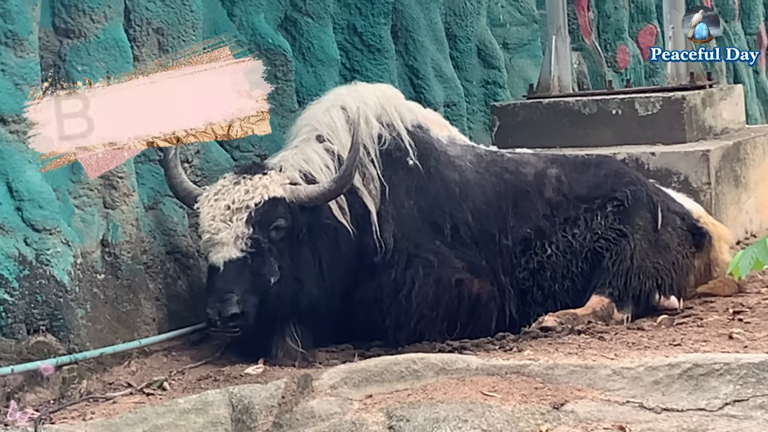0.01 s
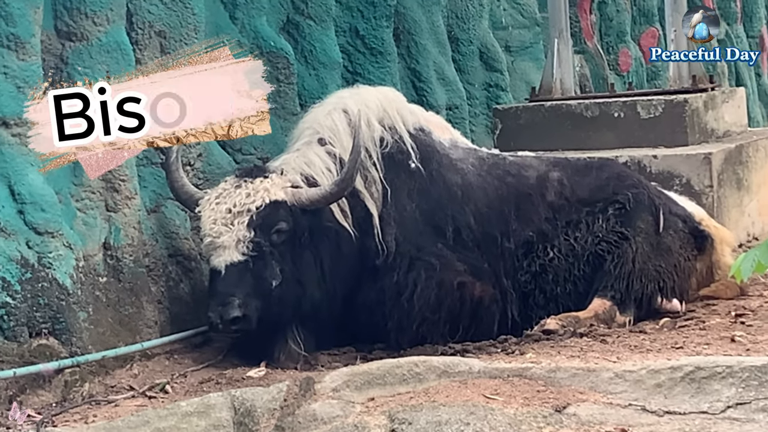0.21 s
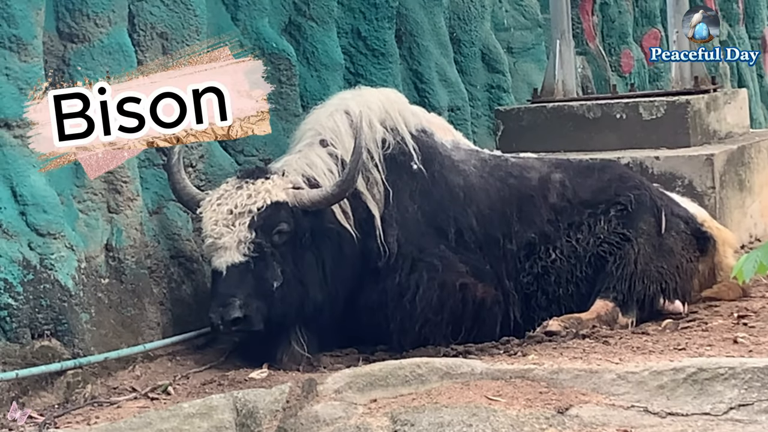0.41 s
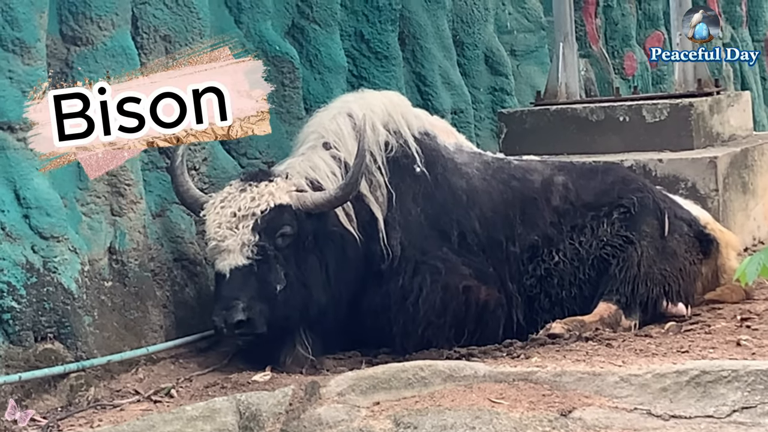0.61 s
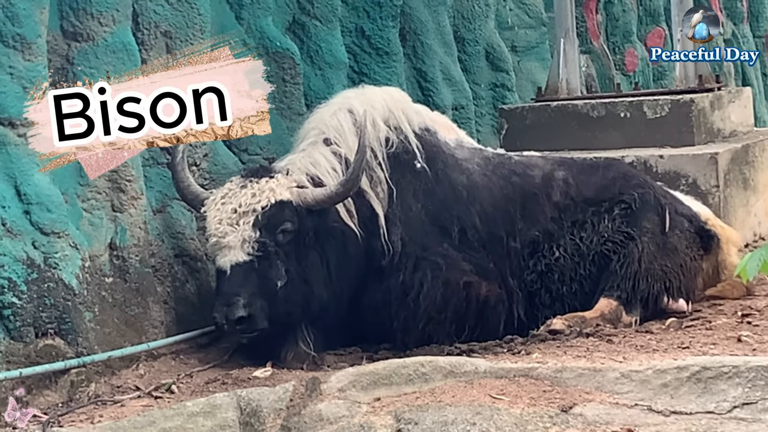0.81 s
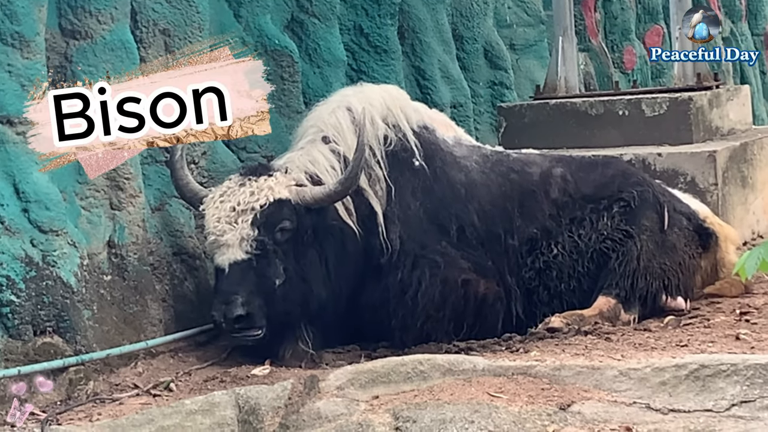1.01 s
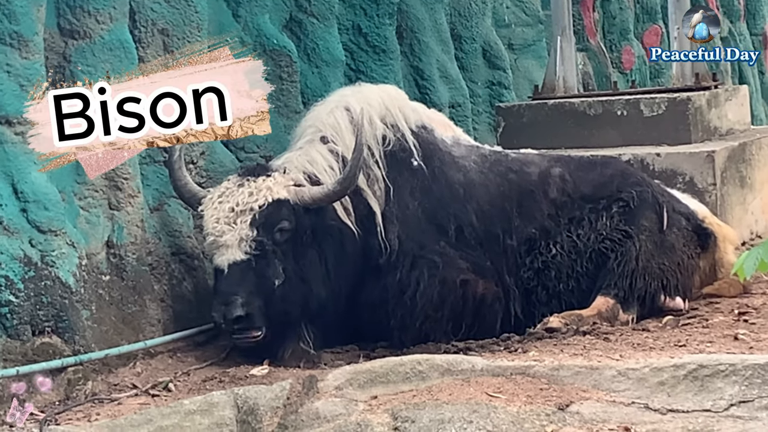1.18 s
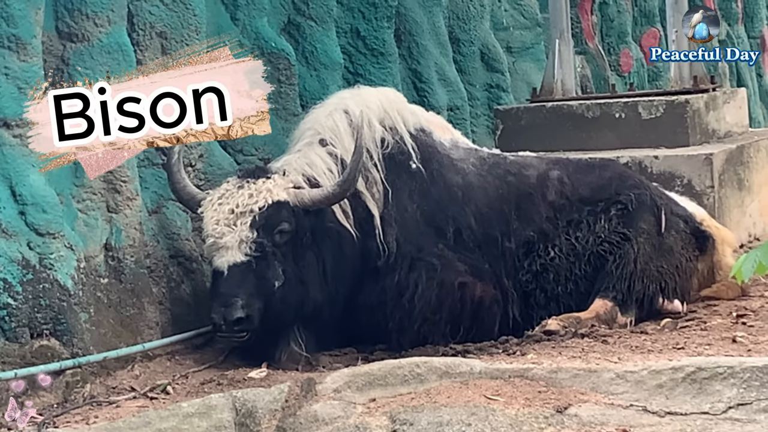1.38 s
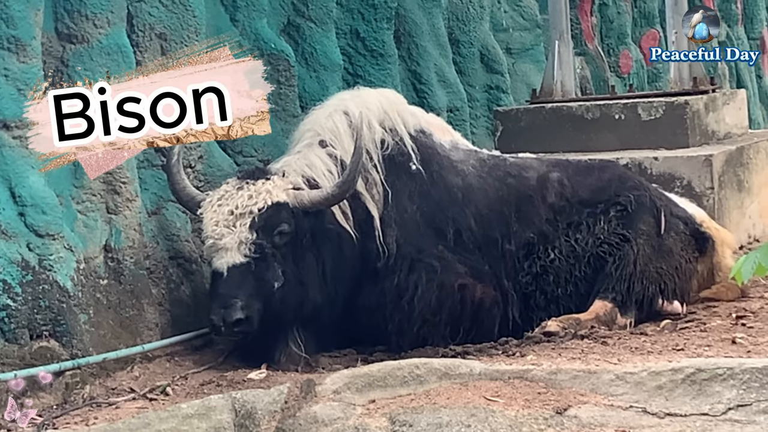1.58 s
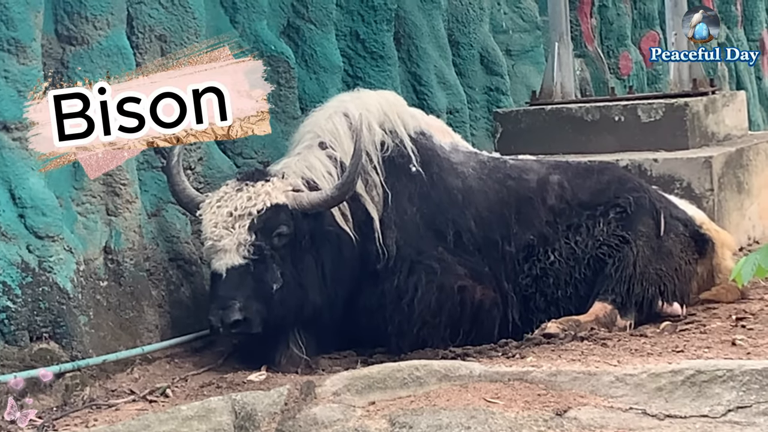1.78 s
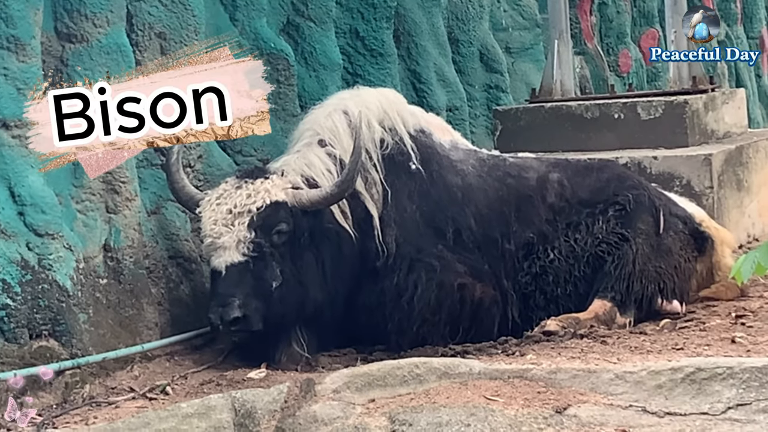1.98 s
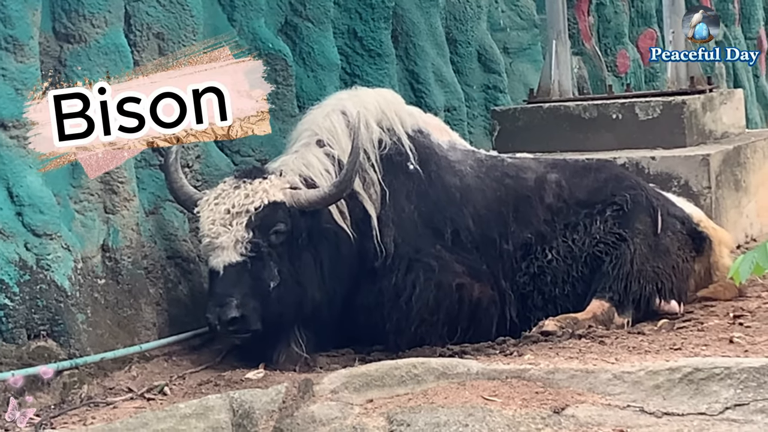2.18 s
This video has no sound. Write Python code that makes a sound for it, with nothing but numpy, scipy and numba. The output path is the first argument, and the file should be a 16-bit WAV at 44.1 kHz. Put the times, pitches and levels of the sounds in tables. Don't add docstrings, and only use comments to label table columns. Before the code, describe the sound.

Two low, guttural yak grunts, the first louder and more resonant, the second slower and weaker. Dry stems tick before and between them, with short dull reflections off rock, faint distant chirps and a quiet low background hum.

```python
import sys
import numpy as np
from scipy import signal
from scipy.io import wavfile
from scipy.ndimage import uniform_filter1d
from numba import njit

SR = 44100
rng = np.random.default_rng(int(sys.argv[2]) if len(sys.argv) > 2 else 0)


def waveform_to_disk(signal):
    frames = np.transpose(np.atleast_2d(signal))
    scaled = np.clip(frames, -1, 1) * 32767
    samples = np.round(scaled).astype(np.int16)
    wavfile.write(sys.argv[1], SR, samples)


def volts_from_decibels(level):
    exponent = np.asarray(level, float) / 20
    return 10 ** exponent


N = 99225

THROB = ((.2, .7), (.1, .9), (.6, .65), (.1, .15))


@njit
def svf(x, g, k):
    y, b, l = np.empty(len(x)), 0., 0.
    for i in range(len(x)):
        v = (b + g[i] * (x[i] - l)) / (1 + g[i] * (g[i] + k[i]))
        b = 2 * v - b
        l = l + 2 * g[i] * v
        y[i] = k[i] * v
    return y


def band(x, hz, width):
    hz, one = np.clip(hz, 10, .45 * SR), np.ones(len(x))
    return svf(x + 1e-18, one * np.tan(np.pi * hz / SR), one * width / hz)


def unit(x):
    return x / np.sqrt(np.mean(x ** 2))


def walk(rate):
    k = int(SR / rate)
    steps = np.repeat(rng.standard_normal(N // k + 1), k)
    return 1.3 * uniform_filter1d(uniform_filter1d(steps, k), k)[:N]


def bump(start, length):
    return np.sin(np.pi * np.clip((np.arange(N) / SR - start) / length, 0, 1))


def add(out, s, piece):
    i = int(s * SR)
    out[i:i + len(piece)] += piece[:N - i]


def first_grunt():
    # (time [s], rate [claps per s])
    claps_1 = [
        (.24, 39),
        (.287, 32.09),
        (.37, 39.99),
        (.43, 48.92),
        (.52, 38.13),
        (.62, 31.21),
        (.8, 25.56),
        (1.11, 24.98),
    ]
    # (time [s], effort [dB], chest share [dB], mouth opening [dB], mouth pitch [factor])
    effort_1 = [
        (.2, -33, -12, -8, 0.89),
        (0.295, -44.5, -3, 14.5, 0.94),
        (.36, -31.5, 6, 0.5, 1.08),
        (0.459, -26, -8, 3, 1.017),
        (0.619, -21.5, -11.5, -7, 0.949),
        (0.718, -31.5, 12, -6, 0.96),
        (.83, -44.5, 11.5, -7, 0.93),
        (0.939, -53, 22, -1, 1.22),
        (1.15, -63, 2, -6, 1.4),
    ]
    # (centre [Hz], width [Hz], level [dB])
    tract_1 = [
        (154.5, 34, -1.5),
        (111, 24, -18.5),
        (227.2, 22, 1),
        (286, 44, -16),
        (384, 140, -15),
        (504.3, 27, -12),
        (947, 127, -19),
        (1450, 250, -32),
    ]
    # (time [s], pitch [Hz], level [dB])
    throat_before = [(.1, 236.6, -63), (.122, 241.4, -31.5), (.18, 238, -46.5), (.238, 225.4, -35),
                     (.3, 233.4, -25.5), (.32, 235, -49)]
    throat_1 = [(.31, 234, -29.5), (.345, 234.6, -21.5), (.405, 214.6, -32.5), (.474, 219.8, -19.5),
                (.502, 232, -30.5), (.54, 229.8, -20.5), (.58, 229.5, -30), (.76, 217.2, -27.5),
                (.92, 205.6, -47.5)]
    chest_1 = [(0.35, 158, -48), (0.385, 152.9, -21), (0.532, 155.9, -25.5), (0.59, 167.4, -32),
               (0.665, 165, -32.5), (0.73, 144.8, -20.5), (0.81, 159, -43.5), (0.992, 151.7, -34.5),
               (1.12, 144.4, -43.5)]
    lines = [(throat_before, THROB[3]), (throat_1, THROB[0]), (chest_1, THROB[1])]
    return grunt(claps_1, effort_1, tract_1, lines)


def second_grunt():
    # (time [s], rate [claps per s])
    claps_2 = [
        (1.24, 27),
        (1.275, 19.64),
        (1.45, 29.13),
        (1.6, 31.73),
        (1.7, 31.63),
        (1.82, 29.1),
        (1.885, 27),
        (1.92, 24.6),
        (2.0, 23.56),
    ]
    # (time [s], effort [dB], chest share [dB], mouth opening [dB], mouth pitch [factor])
    effort_2 = [
        (1.129, -62.5, 11, -2, 0.61),
        (1.281, -54.5, 15.5, 5.5, 0.89),
        (1.47, -46, 6.5, 5, 1),
        (1.54, -42, 3.5, 4.5, 0.99),
        (1.62, -38, -5, 1.5, 0.89),
        (1.68, -34, -4, 3, 0.99),
        (1.77, -35, 0.5, -1.5, 0.93),
        (1.89, -41, 3.5, 0.5, 0.91),
        (2.24, -66, 14, -16, .9),
    ]
    # (centre [Hz], width [Hz], level [dB])
    tract_2 = [(154.8, 15.2, 1), (122.5, 56, -1), (228.8, 21.7, 1), (280.5, 30, -7), (391.4, 43, -4.5),
               (610, 290, -8.5), (1138, 125, -14), (1680, 900, -25), (2400, 110, -19), (2770, 81, -29.5),
               (3750, 230, -30), (4240, 81, -36), (7440, 360, -26), (8300, 93, -31)]
    # (time [s], pitch [Hz], level [dB])
    chest_2 = [(1.3, 149.1, -48), (1.466, 139.1, -38), (1.526, 132.4, -39), (1.686, 153, -33),
               (1.844, 142.9, -40.5), (2.006, 171.3, -38.5), (2.038, 166, -61), (2.06, 165.1, -33.5)]
    return grunt(claps_2, effort_2, tract_2, [(chest_2, THROB[2])])


def grunt(claps, effort, tract, lines):
    jitter_s, shimmer_db, drift = .0005, 1.0, .012
    rasp_db, rasp_share = -12, .45
    soften, bright_hz, bright_gain, lip_delay_s = 2.3, 800, 1.7, .0015
    # (time [s], length [s], lowest frequency [Hz], extra rasp [dB])
    nostril = (1.63, .29, 6000, 18)
    # (low edge [Hz], high edge [Hz])
    tongue_hz = (1050, 1300)

    t, claps, effort = np.arange(N) / SR, np.array(claps).T, np.array(effort).T
    rate = np.interp(t, *claps)
    phase = np.cumsum(rate) / SR
    phase = phase - phase[int((claps[0, 1] + .0015) * SR)]
    at = np.flatnonzero(np.diff(np.floor(phase)))
    chance = rng.standard_normal((len(at), 2 + len(tract))).T
    at = np.clip(at + (jitter_s * SR * chance[0]).astype(int), 0, N - 999)
    rasp = volts_from_decibels(rasp_db) * np.exp(-(phase % 1) / rasp_share) * rng.standard_normal(N)

    level, chest, mouth = (volts_from_decibels(np.interp(t, effort[0], c)) for c in effort[1:4])
    level = level * (t > effort[0, 0]) * (t < effort[0, -1])
    pitch = np.interp(t, effort[0], effort[4])
    out = sum(sing(line, phase, throb) for line, throb in lines)
    for k, (hz, width, db) in enumerate(tract):
        bright, nose = hz > bright_hz, hz > nostril[2]
        drive = rasp * volts_from_decibels(nose * nostril[3])
        shimmer = volts_from_decibels(shimmer_db * (chance[1] + (1 + .5 * bright) * chance[k + 2]))
        drive[at + int(bright * lip_delay_s * SR)] += np.sqrt(SR / rate[at]) * shimmer

        if hz < 180:
            share = chest
        elif hz < 300 or tongue_hz[0] < hz < tongue_hz[1]:
            share = 1
        else:
            share = mouth ** (bright_gain if bright else 1)
        if nose:
            share = share * bump(*nostril[:2])

        centre = hz * (pitch if 300 < hz < 800 else 1)
        wander = 1 + drift * walk(8.3) * min(1, 600 / hz)
        ring = band(drive * level * share, centre * wander, width)
        ring = band(ring, centre, soften * width)
        out = out + (-1) ** k * volts_from_decibels(db) * np.sqrt(SR / np.pi / width) * ring
    return out


def sing(line, phase, throb):
    t, line = np.arange(N) / SR, np.array(line).T
    throb = np.interp(t, line[0, [0, -1]], throb)
    pulse = np.exp(-(((phase - .1) % 1) / .68) ** 2.5)
    swell = uniform_filter1d(1 - throb + 1.5 * throb * pulse, SR // 140)
    edge = np.clip(np.minimum(t - line[0, 0], line[0, -1] - t) / .02, 0, 1)
    hz = np.interp(t, line[0], line[1]) * (1 + .012 * walk(40.7))
    db = np.interp(t, line[0], line[2]) + 1 + 0.5 * walk(26.6)
    return np.sqrt(2) * volts_from_decibels(db) * edge * swell * np.sin(2 * np.pi * np.cumsum(hz) / SR)


def gulp():
    # (time [s], length [s], start pitch [Hz], end pitch [Hz], level [dB])
    chest_gulp = (.315, .075, 165, 98, -31)
    start, length, from_hz, to_hz, db = chest_gulp
    hz = np.interp(np.arange(N) / SR, [start, start + length * 0.52], [from_hz, to_hz])
    return volts_from_decibels(db) * np.sqrt(2 * bump(start, length)) * np.sin(2 * np.pi * np.cumsum(hz) / SR)


def litter():
    # (time [s], peak level [dB], centre [Hz])
    ticks = [(0.051, -28.5, 6000), (0.0625, -35, 8000), (0.0775, -32, 10000), (0.092, -30, 10000),
             (0.0945, -29, 7000), (0.099, -39, 9100), (0.1077, -26.5, 10000), (0.111, -30, 4970),
             (0.1155, -36, 10000), (0.123, -38, 11900), (0.13, -28, 10900), (0.1325, -28, 7000),
             (0.136, -34, 9100), (0.14, -34, 8500), (0.148, -27, 11000), (0.153, -31, 9500),
             (0.168, -38, 12000), (0.18, -35, 10000), (0.204, -32, 5970), (0.22, -37, 8500),
             (0.2295, -35, 8500), (0.3017, -36, 3670), (0.352, -46, 4500), (0.376, -33, 4260),
             (0.421, -32, 3500), (1.3578, -32, 6000), (1.404, -22, 3340), (1.412, -30, 6000),
             (1.419, -30, 5000), (1.434, -35, 7500), (1.445, -28.5, 5000), (1.462, -33, 7000),
             (1.4705, -30.5, 7000), (1.478, -33, 5000), (1.484, -35, 11000), (1.4927, -26.5, 3000),
             (1.501, -36, 4000), (1.6328, -29.5, 8250)]
    # (time [s], length [s], level [dB], centre [Hz])
    rustles = [
        (.06, 0.12, -54, 9400),
        (1.13, 0.23, -55, 4350),
        (1.28, 0.074, -53.5, 10000),
        (1.348, .09, -49.5, 6700),
        (1.407, 0.096, -51, 4800),
        (0.736, .25, -61.5, 8000),
        (1.907, .5, -57.5, 2400),
        (2.115, 0.11, -44, 89),
    ]
    out, t = np.zeros(N), np.arange(SR // 50) / SR
    for s, db, hz in ticks:
        snap = rng.standard_normal(len(t)) * np.exp(-t / 0.00085)
        tick = band(band(snap, hz, hz), hz, hz)
        add(out, s, volts_from_decibels(db - 7) * tick / np.abs(tick).max())
    for s, length, db, hz in rustles:
        grains = rng.standard_normal(N) * volts_from_decibels(2.5 * walk(250) + 1.6 * walk(45))
        out = out + volts_from_decibels(db) * bump(s, length) ** .7 * unit(band(grains, hz, 1.2 * hz))
    return out


def trill():
    # (time [s], start pitch [Hz], level [dB])
    chirps = [(.52, 4450, -75), (.548, 4370, -80), (.572, 4130, -71), (.582, 4448, -75), (0.596, 4000, -67),
              (.624, 4000, -66), (0.648, 3890, -62.5), (0.68, 4250, -69), (0.527, 2680, -68),
              (.56, 2940, -79), (1.403, 3120, -59), (2.063, 2750, -59)]
    chirp_s, rise = .013, 0.079
    out, t = np.zeros(N), np.arange(int(chirp_s * SR)) / SR
    for s, hz, db in chirps:
        whistle = np.sin(2 * np.pi * hz * t * (1 + rise * t / chirp_s / 2))
        add(out, s, volts_from_decibels(db + 14) * np.sin(np.pi * t / chirp_s) * whistle)
    return out


def rocks(x):
    t60_s, wall_db = .22, -16
    t = np.arange(SR // 2) / SR
    decay = np.exp(-t * np.log(1000) / t60_s)
    tail = band(rng.standard_normal(len(t)), 726.0, 1580.0) * decay * (t > .008)
    return volts_from_decibels(wall_db) * signal.fftconvolve(x, tail / np.sqrt(np.sum(tail ** 2)))[:N]


def gust():
    # (time [s], length [s], pitch [Hz], level [dB])
    thud = (1.92, .13, 51, -40)
    s, length, hz, db = thud
    t = np.arange(N) / SR
    return volts_from_decibels(db) * bump(s, length) ** .5 * np.sin(2 * np.pi * hz * (t - s) + 1.2 * walk(12))


def hum():
    # (frequency [Hz], density [dB per Hz])
    spectrum = [(25, -6), (48, 2.5), (72, -17.5), (110, 5.5), (200, -5.5), (400, -7), (850, -9),
                (2290, -21), (5500, -30), (12000, -31), (15500, -30.5)]
    out, swell, curve = 0, walk(0.65), np.array(spectrum).T
    for hz in 25 * 2 ** np.arange(0, 9.6, .4):
        db = np.interp(np.log(hz), np.log(curve[0]), curve[1]) + 1.8 * swell + 1.2 * walk(11.93)
        noise = band(rng.standard_normal(N), hz, hz * 0.75)
        out = out + volts_from_decibels(db) * band(noise, hz, hz * 0.75)
    return volts_from_decibels(-42) * unit(out)


def scene():
    near = first_grunt() + second_grunt() + gulp() + litter() + trill()
    return (near + rocks(near) + gust() + hum())[None]


def roll_off(x):
    return signal.sosfilt(signal.butter(12, 15640, fs=SR, output="sos"), x)


def record(dry):
    top_edge = signal.ellip(10, .2, 70, 15700, fs=SR, output="sos")
    mix = signal.sosfilt(top_edge, dry)
    return roll_off(mix)


dry = scene()
out = record(dry)
waveform_to_disk(out)
```